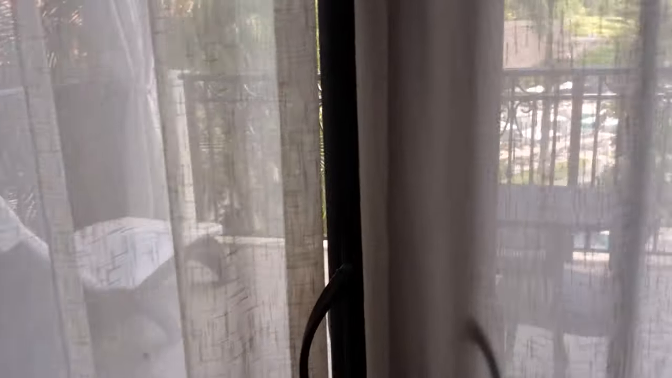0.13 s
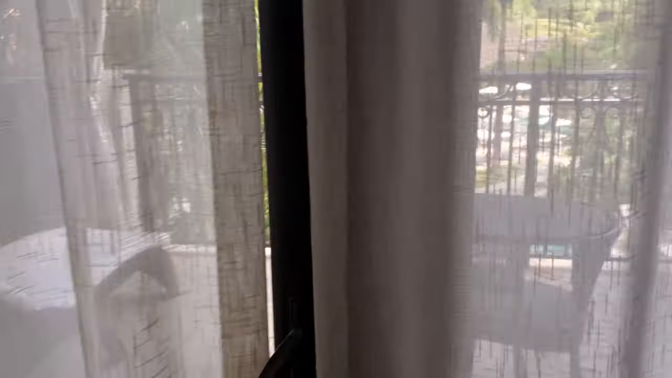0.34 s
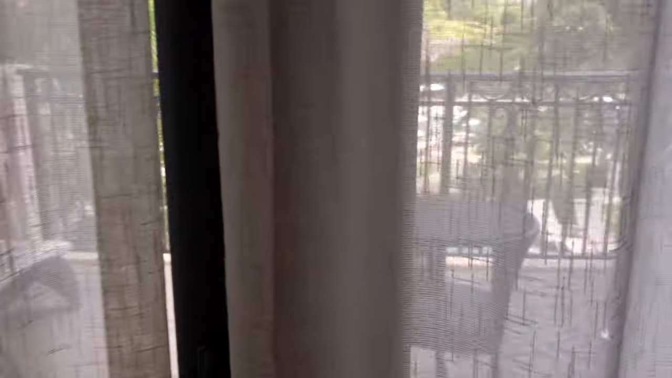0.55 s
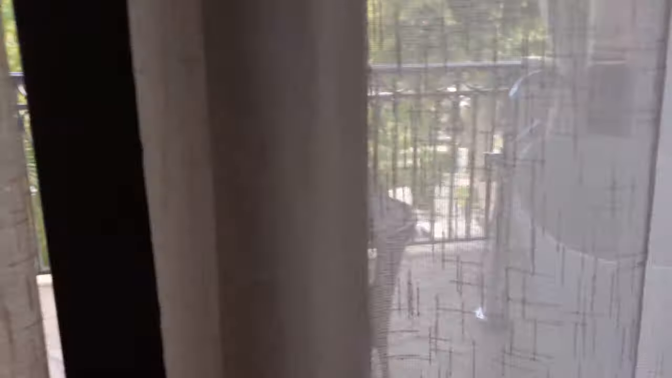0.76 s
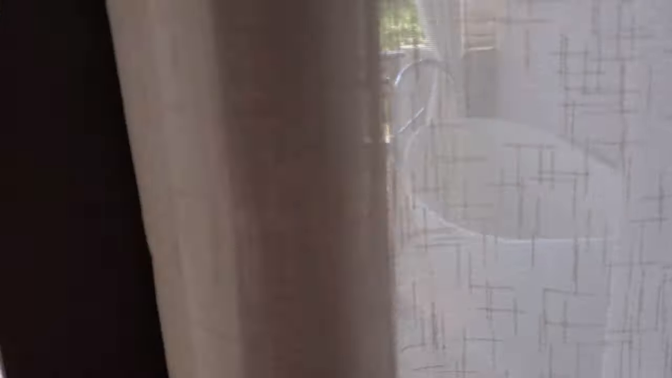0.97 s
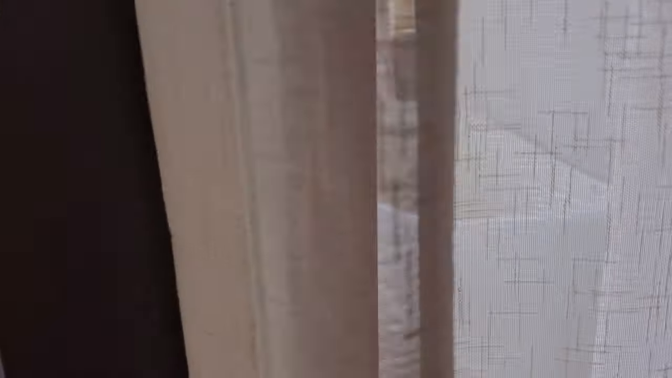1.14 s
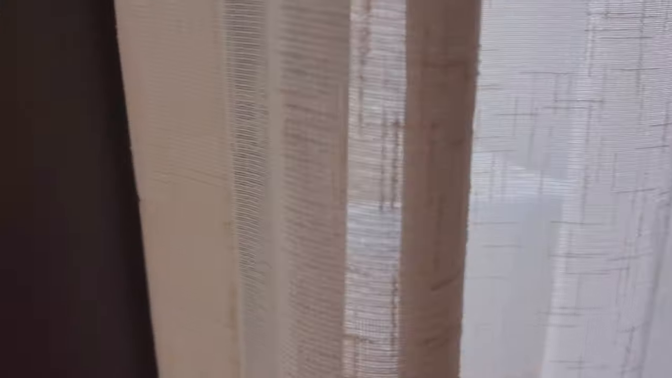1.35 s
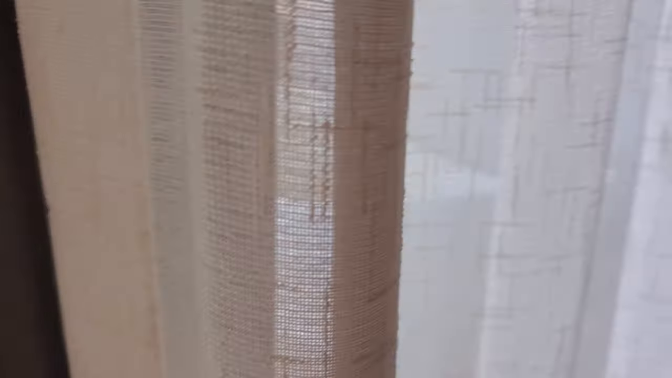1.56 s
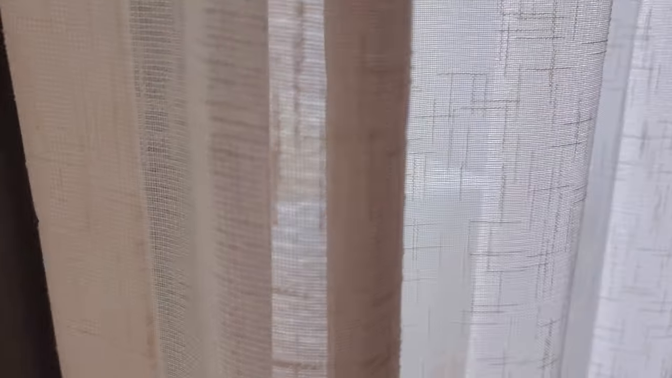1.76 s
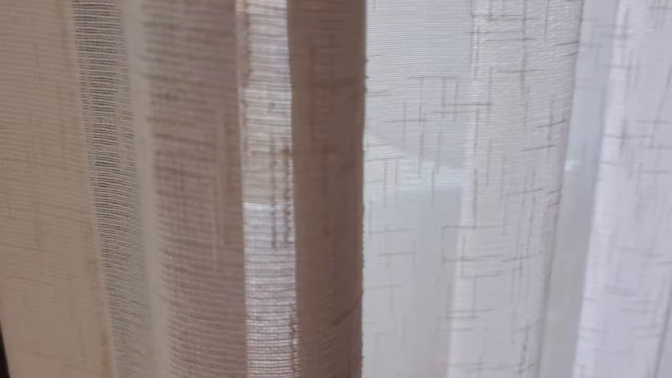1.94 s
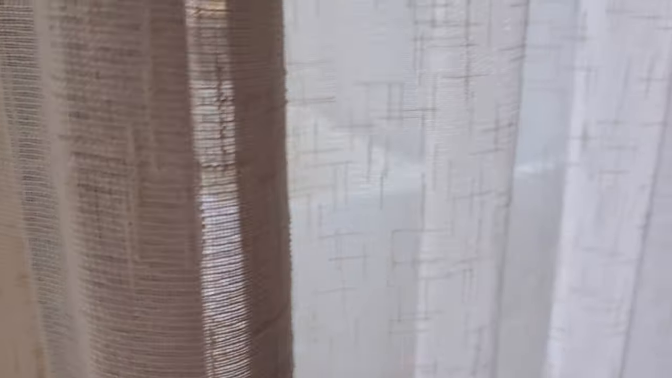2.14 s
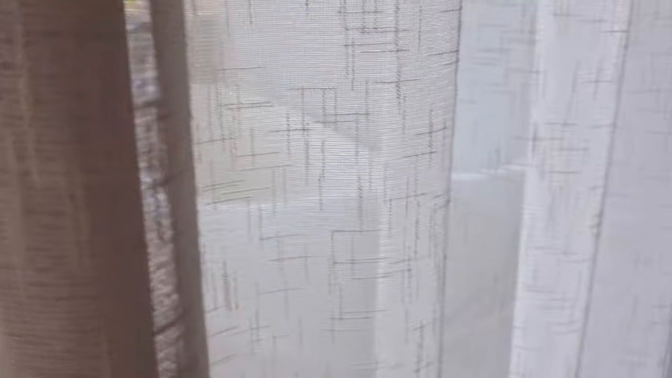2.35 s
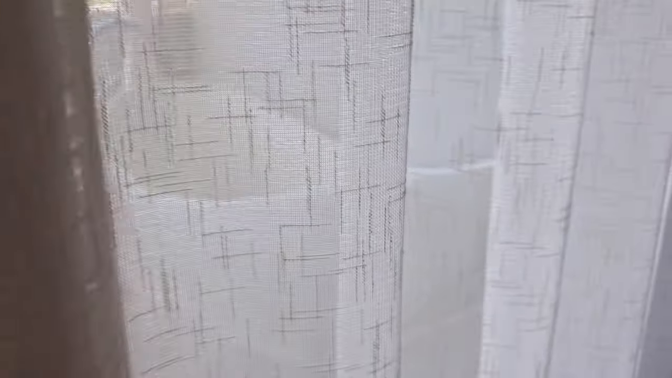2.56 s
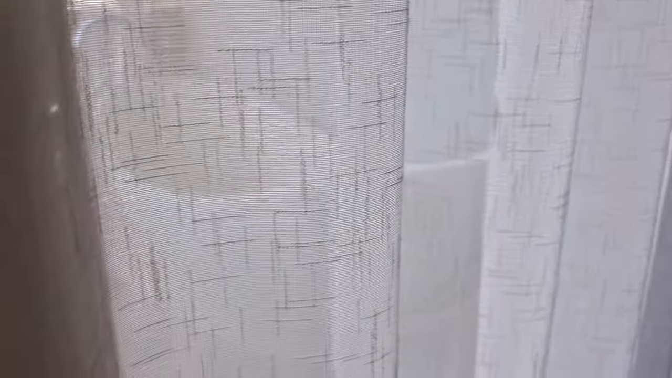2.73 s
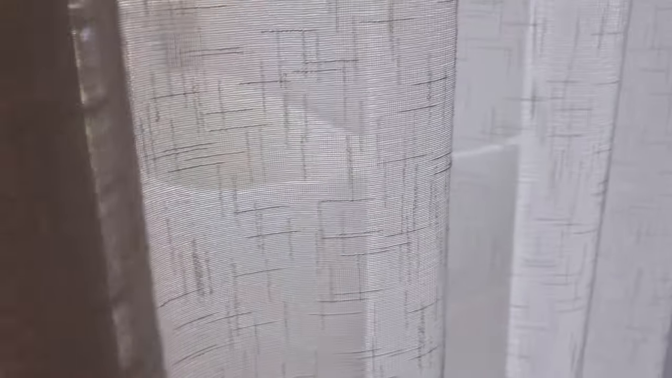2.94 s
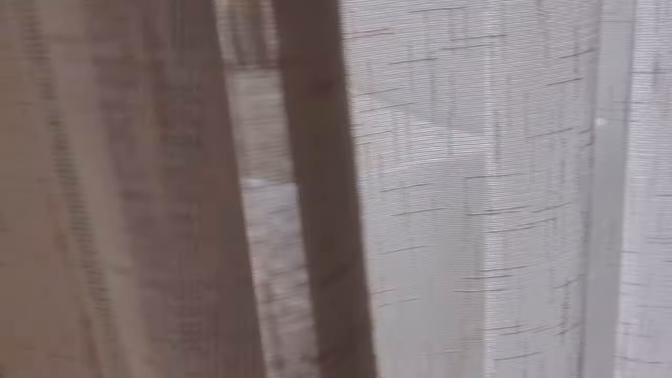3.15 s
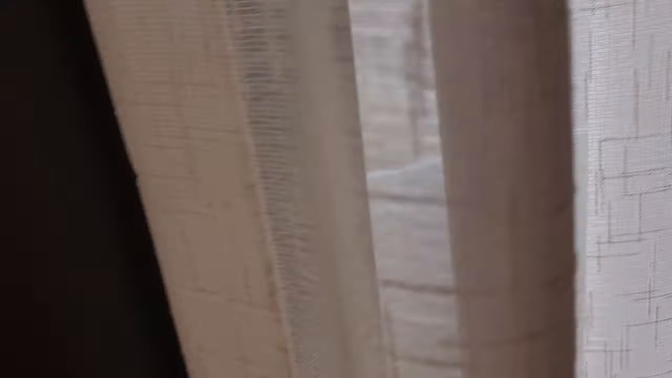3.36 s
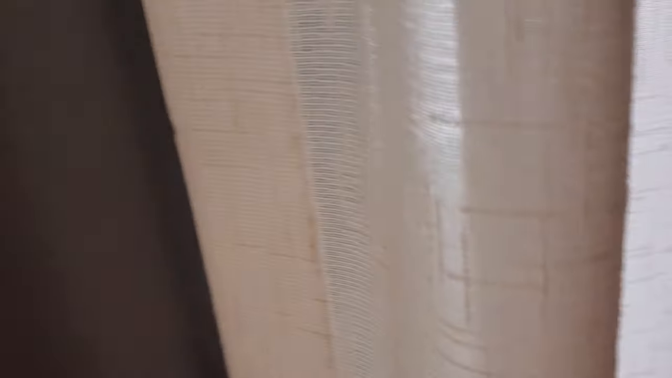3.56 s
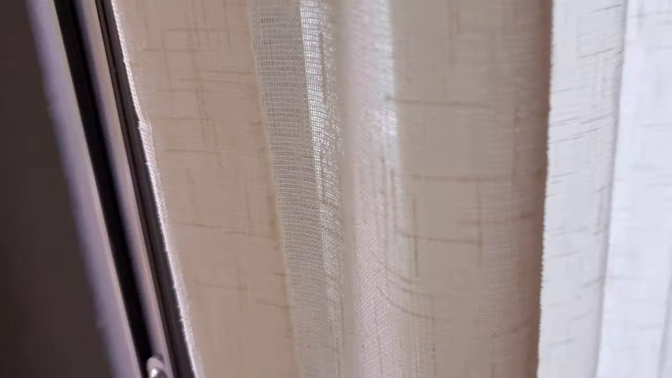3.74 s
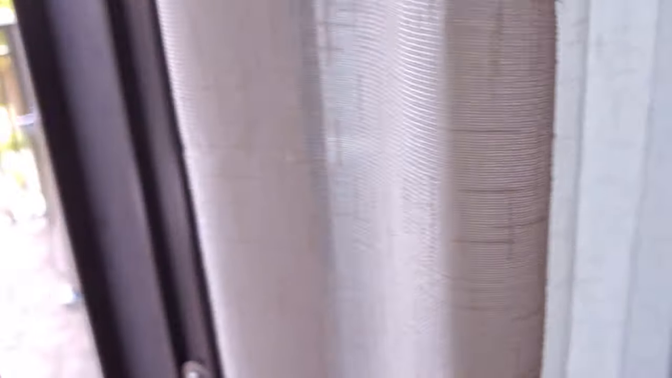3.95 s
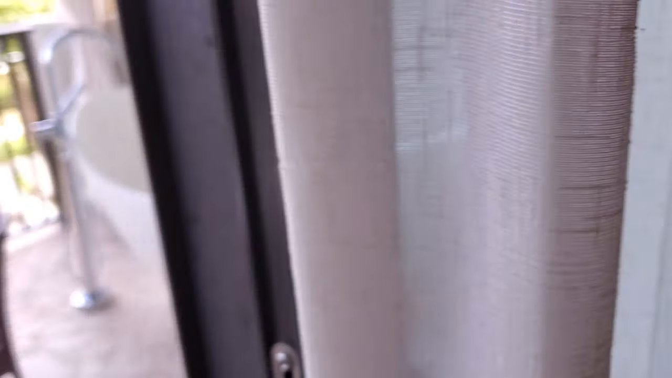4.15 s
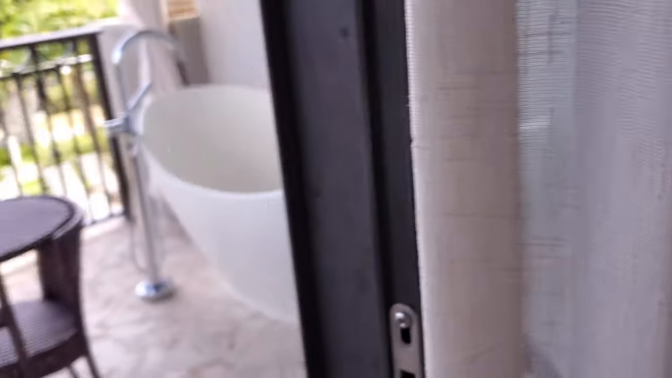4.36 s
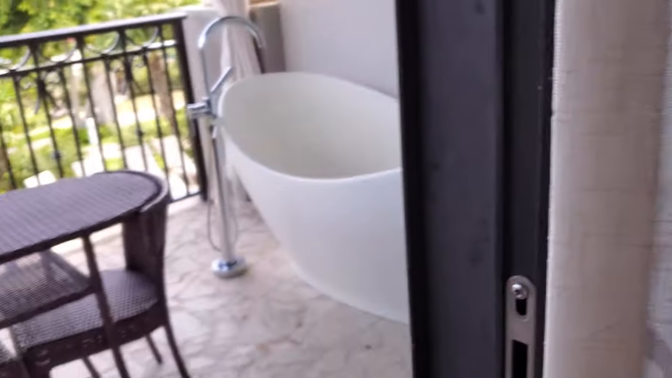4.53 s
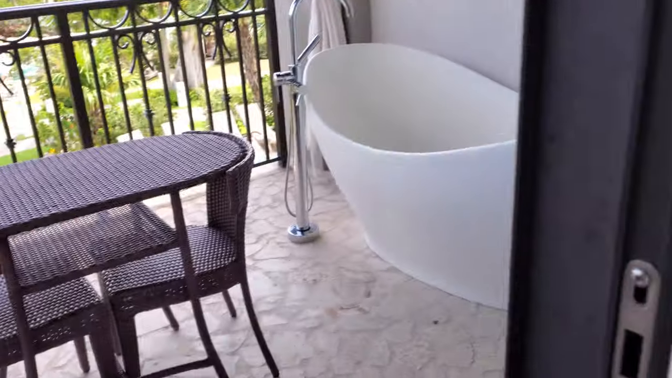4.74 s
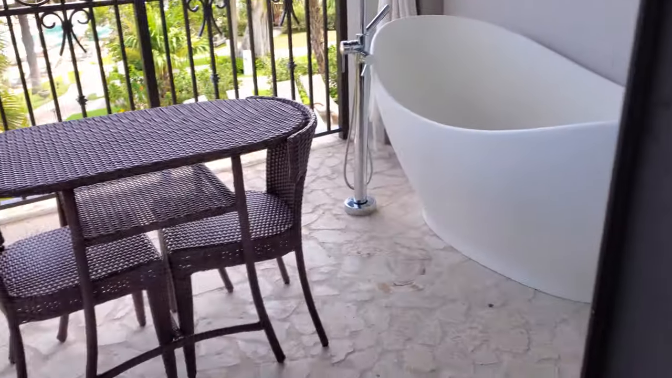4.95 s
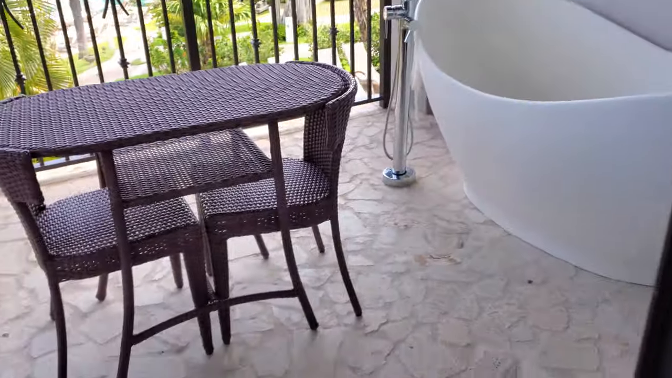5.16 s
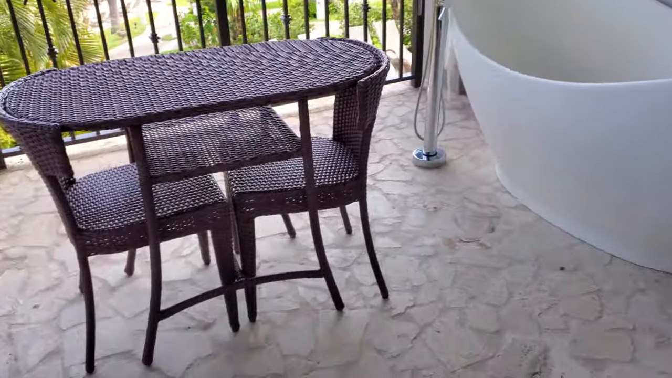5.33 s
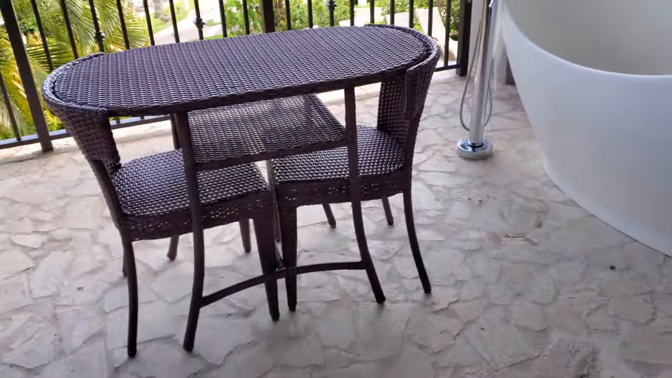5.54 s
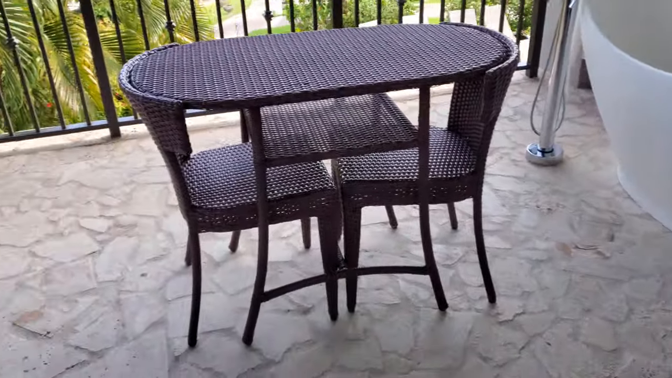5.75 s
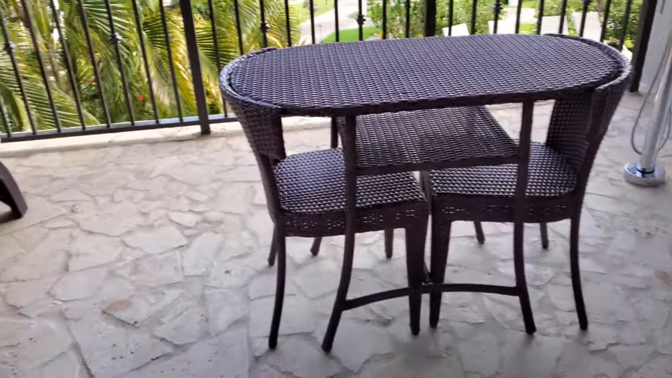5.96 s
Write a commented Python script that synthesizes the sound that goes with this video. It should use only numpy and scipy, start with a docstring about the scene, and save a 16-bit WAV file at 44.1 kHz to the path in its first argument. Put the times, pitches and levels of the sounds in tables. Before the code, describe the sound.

Stereo, near the door of a hard-walled room with a low ventilation hum. Light metal rattles and firm latch clacks come first, with faint cloth rustle and low pane thuds between. The glass door breaks free with the loudest boom and clatter, rumbles and hisses for just over a second, then strikes its stop. Outdoor air remains, with several fading knocks.

```python
"""Sliding glass door to a balcony

In a quiet, hard-walled room, handle and lock clack in coloured noise bursts and the glass booms on its modes.
The door jerks free and rolls: rumbling, chattering and ticking noise, with the steady hiss of brush seals.
It bangs on its stop and duller knocks follow, each a noise crack with ringing modes and a room tail.
Ventilation drones beneath, a curtain rustles, and outdoor air fades in as noise while the gap widens.
"""
import sys
import numpy as np
from scipy import signal
from scipy.fft import rfft, irfft, next_fast_len
from scipy.io import wavfile

SR = 44100
rng = np.random.default_rng(int(sys.argv[2]) if len(sys.argv) > 2 else 0)


def transcribe(signal):
    """Save signal, clipped to [-1, 1], as a 16-bit WAV file at the path in sys.argv[1]."""
    frames = np.atleast_2d(signal).T
    limited = np.clip(frames, -1, 1)
    pcm = np.round(limited * 32767).astype(np.int16)
    wavfile.write(sys.argv[1], SR, pcm)


N = 268965
T = np.arange(N) / SR

# Levels below are set before each source's mix gains; colours are relative, as noise is scaled to unit power.

# Stereo: likeness of the channels (frequency [Hz], left-right correlation before the lag [0-1])
LIKENESS = [(60, 0.98), (290, 1), (640, 0.9), (1400, 0.33), (3000, 0.033), (12000, 0.034)]
# Stereo: balance of the channels (frequency [Hz], left minus right [dB])
LEAN = [(30, 3.5), (120, 1.5), (300, -.6), (1000, -1.8), (2000, -1.2), (4000, -2), (8000, .3), (16000, .5)]
RIGHT_LAG_S, CUTOFF_HZ = 0.0002, 16000

# Room: decay time of the tail (frequency [Hz], t60 [s])
ROOM_T60 = [(60, 0.42), (250, 0.39), (1000, 0.53), (3000, 0.52), (7000, 0.55), (16000, 0.31)]
# Room: starting level of the tail (frequency [Hz], relative level [dB])
ROOM_COLOUR = [(60, 13), (250, 10.5), (1000, 2), (3000, 1.5), (7000, -4), (16000, 3.5)]
FLAT_COLOUR = [(20, 0), (16000, 0)]   # (frequency [Hz], density [dB per Hz])

# Soft bumps (time [s], level [dB], t60 [s], brightness [dB per octave])
BUMPS = [(0, -46, .6, 4.5), (.137, -41.5, 0.21, -1.5), (2.699, -49.5, 0.28, 2), (6.034, -44.5, 0.33, -18)]
# Colour of the bumps (frequency [Hz], density [dB per Hz])
BUMP_COLOUR = [(40, -61), (150, -33), (330, 7), (550, 0), (1100, -1.5), (1600, -10), (4000, -30.5),
               (8000, -54)]
BUMP_SWELL_S = 0.008

# Colour of the indoor air (frequency [Hz], density [dB per Hz])
INDOOR_COLOUR = [(25, -12), (50, -4.5), (80, -1.5), (115, -15), (145, 3.5), (180, -17.5), (280, -6.5),
                 (350, -10), (500, -7), (660, -14.5), (850, -12), (1500, -17), (3000, -23.5), (6000, -32),
                 (8000, -40), (16000, -53)]
# Colour of the outdoor air (frequency [Hz], density [dB per Hz])
OUTDOOR_COLOUR = [(25, -33), (60, 5.5), (120, -12), (210, -17), (310, -11.5), (500, -24), (650, -25),
                  (1100, -21.5), (2500, -23), (6000, -30), (8000, -39), (12500, -35), (16000, -40)]
# Resonances of the ventilation drone (frequency [Hz], width [Hz], relative level [dB])
DRONE = [(147.2, 1.7, -5), (205, 5.9, 5), (353.6, 3.5, 5.5)]
INDOOR_DB, OUTDOOR_DB = -53, -46.5   # outdoors with the door wide open
INDOOR_PAN_DB = -1   # left minus right: the ventilation lies a little to the right

# Folds of the curtain brush past the hand (peak time [s], level [dB], rise and fall time constant [s])
RUSTLES = [(1.33, -54, 0.16), (1.78, -59.5, 0.047), (3.0, -58, 0.16), (3.23, -60, 0.029), (3.39, -69, 0.03),
           (3.61, -64, .04)]
# Colour of the cloth (frequency [Hz], density [dB per Hz])
CLOTH_COLOUR = [(500, -9), (2500, -3), (6000, -3), (8000, -11.5), (16000, -6)]
CURTAIN_REST_DB = -78.5

# Shoves that set the pane booming (time [s], level [dB], swell [s])
SHOVES = [(1.16, -43.5, 0.0092), (1.275, -41, 0.0091), (1.66, -39.5, 0.053), (2.228, -33.5, 0.019),
          (2.89, -41.5, 0.039), (3.142, -41.5, 0.041), (3.678, -14, 0.007), (3.75, -22, 0.058),
          (4.04, -31.5, 0.008)]
# Colour of the shoves (frequency [Hz], density [dB per Hz])
PANE_COLOUR = [(22, -29), (31, -23), (42, -6), (65, 4.5), (90, -3), (125, 4), (170, -12.5), (240, -14),
               (340, -10.5), (600, -71)]
# Modes of the glass in its frame (frequency [Hz], level [dB], t60 [s])
PANE_MODES = [(43, -19, 0.41), (62.3, -6.5, 0.74), (80.3, -1.5, 0.73), (121.8, -5.5, 0.49),
              (251, -19, 0.53), (319, -7.5, 0.49)]
# Colour of the shaking pane (frequency [Hz], density [dB per Hz])
MURMUR_COLOUR = [(25, -33), (50, -7), (80, 4.0), (125, -8.0), (200, -13), (600, -61)]
SHOVE_T60_S = 0.62
SHOVE_TILT_DB, SHOVE_DULLS_DB_PER_S = 2, 240   # per octave: a slower swell is duller
# the hand takes hold of the door, and the run leaves the pane shaking
GRIP_S, GRIP_DB, GRIP_DB_PER_S = 1.1, -55, 41
SHAKEN_DB, SETTLE_DB_PER_S = -44, 6

# Heavier clacks of lock and frame (time [s], level [dB], length of the contact [s])
CLACKS = [(1.66, -35.5, .014), (2.097, -37.5, 0.0075), (2.116, -34.5, 0.023), (2.223, -20, 0.014),
          (2.857, -31, 0.021), (2.875, -23.5, 0.026), (3.677, -20.5, .008), (3.697, -15.5, .016)]
# Colour of the clacks (frequency [Hz], density [dB per Hz])
CLACK_COLOUR = [(88, -27), (150, -11.5), (566, -11.5), (871, -14), (1080, -6.5), (1630, -4), (2220, -2),
                (3220, -7.5), (3840, -8), (4410, -11.5), (6640, -14), (8400, -20.5), (11900, -21),
                (16000, -26)]
# Resonances of aluminium frame and lock (frequency [Hz], width [Hz], level [dB])
FRAME = [(1060, 210, -15), (1670, 15, -29), (1800, 21, -15), (1994, 31, 7), (2170, 34, 9), (2722, 22, 10.5),
         (3270, 19, -5), (3600, 21, -18), (5730, 34, -29), (6200, 57, 8)]
# The frame grinds on the track as it comes free (time [s], level [dB], brightness [dB per octave])
GRINDS = [(3.602, -40, -1), (3.627, -37.5, 0), (3.748, -37, -4.5)]
# Light rattles of the handle (time [s], level [dB], brightness [dB per octave])
RATTLES = [(1.163, -49.5, 1.5), (1.272, -23.5, 1), (1.29, -27.5, 0), (1.329, -30, 1.5), (1.381, -27.5, 0.1),
           (1.644, -26, -0.5), (1.657, -27, -1), (1.967, -27, .5), (2.168, -54.5, 12), (3.329, -33, 2),
           (3.533, -33.5, -1.5), (3.756, -24.5, 7), (3.853, -30.5, 5), (3.883, -30.5, 9), (3.951, -29.5, 3),
           (5.447, -20.5, -.5), (5.477, -34, 8)]
# Colour of the rattles (frequency [Hz], density [dB per Hz])
RATTLE_COLOUR = [(150, -2), (400, -2), (900, -5.5), (1250, 0), (1600, -0.5), (2300, 0), (2800, -1.5),
                 (3400, -3.5), (4300, -5.5), (6700, -8.5), (8000, -19), (12000, -18.5), (16000, -26)]
# Small metal parts ping on their own note (time [s], level [dB], pitch [Hz])
PINGS = [(1.329, -36.5, 3300), (1.382, -32, 2870), (3.329, -37, 5950), (3.637, -25.5, 1770),
         (3.699, -23, 1940), (3.853, -31.5, 2900), (4.917, -24, 3070)]
# Band of a ping round its note (multiple of the pitch [ratio], density [dB per Hz])
PING_BAND = [(.5, -45), (.75, -22), (.92, -3), (1, 0), (1.09, -3), (1.33, -22), (2, -50)]
CLACK_ATTACK_S, CLACK_T60_S = 0.0047, 0.08
CLACK_PLAIN_DB, CLACK_BRIGHTENS = -21, 0.12   # dB per octave for each dB over the plain level
GRIND_LENGTH_S, GRIND_T60_S = .01, 0.96
RATTLE_SWELL_S, RATTLE_T60_S = 0.004, 0.055
PING_SWELL_S, PING_T60_S = .002, 0.049

# Colour of the rolling rumble (frequency [Hz], density [dB per Hz])
ROLL_COLOUR = [(18, -42), (30, -12), (69, -4.5), (174, -9.5), (284, -3.5), (344, -8.5), (455, -6),
               (640, -14), (942, -11.5), (1140, -15), (1610, -9.5), (3710, -24), (5000, -39), (6500, -53),
               (11000, -120)]
# Colour of the brush seal (frequency [Hz], density [dB per Hz])
BRUSH_COLOUR = [(1500, -14), (3000, -3.5), (4300, -7), (5700, 3.5), (6600, -4), (7800, -9.5), (9500, -5),
                (11800, 1), (13500, -5), (16000, -2.5)]
# Loudest ticks of the rollers over the track (time of fullest swell, roughly [s], level [dB])
TICKS = [(4.119, -30), (4.304, -35.5), (4.378, -31.5), (4.415, -38), (4.465, -32), (4.551, -35),
         (4.59, -30), (4.656, -38)]
# Colour of ticks and chatter (frequency [Hz], density [dB per Hz])
TICK_COLOUR = [(500, -45), (780, -7), (920, 2), (1050, -10.5), (1200, -10.5), (1700, -14), (3000, -26),
               (8000, -60)]
TICK_SWELL_S, TICK_T60_S = 0.00395, 0.049
# the door runs at an even speed from the jerk that frees it to its stop
START_S, STOP_S = 3.66, 4.87
ROLL_DB, BRUSH_DB = -35.5, -41.5
PICKUP_DB_PER_S, HALT_DB_PER_S = 333, 400
SURGE_S, SURGE_WIDTH_S, SURGE_DB = 3.86, 0.12, 8   # the first pull loads the rollers

# The door meets its stop and rebounds (time [s], level [dB], swell [s], t60 [s], brightness [dB per octave])
BANGS = [(4.864, -18, 0.005, 0.18, 2), (4.906, -23, 0.0036, 0.31, -1)]
# Modes rung by the stop (frequency [Hz], level [dB], t60 [s])
STOP_MODES = [(110, -7, 0.67), (187.6, -7, 0.32), (231.4, -1.5, 0.496), (269.8, 3.5, 0.51),
              (312.4, -7.5, 0.58), (367, -6, 0.29), (501, -12.5, 0.36), (726, -39, .3)]
# Dull knocks on track and sill (time [s], level [dB], swell [s])
KNOCKS = [(5.443, -22, 0.0073), (5.643, -27, 0.0072), (5.78, -38, 0.016)]
# Modes of the sill (frequency [Hz], level [dB], t60 [s])
SILL_MODES = [(141.9, 0.5, 0.67), (175, -28, 0.27), (236, 1.5, 0.95), (302, -5, 0.4), (339, -9, 0.18),
              (510, -7, 0.31)]
# Colour of bangs and knocks (frequency [Hz], density [dB per Hz])
KNOCK_COLOUR = [(35, -42), (70, -20), (180, 1.5), (330, -1), (450, -4), (620, -8.5), (900, -8.5),
                (1150, -7), (2000, -11.5), (3200, -16), (5500, -20.5), (6700, -25), (8000, -35),
                (12000, -33.5), (16000, -37)]
KNOCK_T60_PER_SWELL = 22   # a knock that swells more slowly lasts longer


def from_db(db):
    """Decibels to gain."""
    return 10 ** (np.asarray(db) / 20)


def rms_one(x):
    """Scale to unit power."""
    return x / np.sqrt(np.mean(x ** 2) + 1e-20)


def at_hz(points, hz):
    """Read a table on a log-frequency axis."""
    f, value = np.transpose(points)
    return np.interp(np.log(hz + 1), np.log(f), value)


def lean(hz):
    """Gain of the left and right channel at each frequency."""
    return from_db(np.multiply.outer([.5, -.5], at_hz(LEAN, hz)))


def drift(rate, size):
    """Smooth random wander of about unit spread, with a new random point `rate` times a second."""
    knots = rng.standard_normal(size // 20 + 2)
    return np.interp(np.arange(size) * rate / SR, np.arange(len(knots)), knots)


def noise(colour, size=N, tilt_db=0, grains=1):
    """Unit-power stereo noise, grainy or smooth, coloured: alike in the bass, apart in the treble."""
    padded = next_fast_len(size, real=True)
    hz = np.fft.rfftfreq(padded, 1 / SR)
    mid, side = rfft(grains * rng.standard_normal((2, size)), padded)
    alike = np.clip(at_hz(LIKENESS, hz), 0, 1)
    pair = np.sqrt(1 + alike) * mid + np.sqrt(1 - alike) * side * [[1], [-1]]
    pair[1] *= np.exp(-2j * np.pi * hz * RIGHT_LAG_S)
    heard = (hz > 20) & (hz < CUTOFF_HZ)
    gain = heard * lean(hz) * from_db(at_hz(colour, hz) + tilt_db * np.log2(hz + 1))
    return rms_one(irfft(pair * gain, padded)[:, :size])


def resonate(x, resonances):
    """Parallel two-pole resonances: a narrower width rings longer."""
    out = 0
    for hz, width, db in resonances:
        r = np.exp(-np.pi * width / SR)
        poles = [1, -2 * r * np.cos(2 * np.pi * hz / SR), r * r]
        peak_gain = from_db(db) * (1 - r * r) / 2
        out = out + peak_gain * signal.lfilter([1, 0, -1], poles, x + 1e-18)
    return out


def add(out, s, sound):
    """Mix a sound in at a given time."""
    part = out[:, round(s * SR):][:, :sound.shape[-1]]
    part += sound[..., :part.shape[1]]


def contacts(rows, colour, grain_db, grain_rate, attack_s=np.inf):
    """Tiny contacts of loose parts as grainy noise: swell, then decay; a short attack holds in between."""
    out, t = np.zeros((2, N)), T[:SR // 2]
    for s, db, swell, t60, tilt_db in rows:
        rise = np.minimum(t / min(swell, attack_s), 1)
        decay = from_db(-60 * np.maximum(t - swell, 0) / t60)
        grains = from_db(grain_db * drift(grain_rate, len(t)))
        flurry = noise(colour, size=len(t), tilt_db=tilt_db, grains=grains)
        add(out, s, from_db(db) * rise * decay * flurry)
    return out


def ringing(rows, modes):
    """Each blow excites a body's modes as decaying sines, a little differently every time."""
    out, t = np.zeros((2, N)), T[:SR]
    hz, mode_db, t60 = np.transpose(modes)
    rings = from_db(-60 * t / t60[:, None]) * np.sin(2 * np.pi * hz[:, None] * t)
    signs = (-1) ** np.arange(len(hz))
    for s, db, swell, _, tilt_db in rows:
        chance_db = rng.standard_normal(len(hz))
        strength = from_db(db + mode_db + tilt_db * np.log2(hz / hz.mean()) + chance_db)
        add(out, s, np.minimum(t / swell, 1) * ((lean(hz) * signs * strength) @ rings))
    return out


def room(x, build_s):
    """Reverb from a diffuse noise tail that builds up and dies octave by octave."""
    t, tail = T[:SR * 3 // 4], 0
    wash = noise(FLAT_COLOUR, size=len(t))
    for hz in 44 * 2 ** np.arange(9):
        edges = [hz / np.sqrt(2), hz * np.sqrt(2)]
        band = signal.sosfilt(signal.butter(2, edges, "band", fs=SR, output="sos"), wash)
        fade = from_db(at_hz(ROOM_COLOUR, hz) - 60 * t / at_hz(ROOM_T60, hz))
        tail = -tail + band * fade   # neighbouring octaves alternate in sign
    tail = rms_one(tail * np.minimum(t / build_s, 1)) / np.sqrt(len(t))
    return signal.fftconvolve(x, tail, axes=1)[:, :N]


def soft_bumps():
    """Soft bumps: short swells of mid-heavy grainy noise that die away."""
    rows = [(s, db, BUMP_SWELL_S, t60, tilt_db) for s, db, t60, tilt_db in BUMPS]
    return contacts(rows, BUMP_COLOUR, grain_db=1.5, grain_rate=150)


def air():
    """Ventilation drones through narrow resonances; outdoor hiss comes in as the gap widens."""
    drone = rms_one(resonate(noise(INDOOR_COLOUR), DRONE))
    vent = noise(INDOOR_COLOUR) + from_db(-6.5) * drone
    indoor_gain = from_db(INDOOR_DB + INDOOR_PAN_DB * np.array([[.5], [-.5]]))
    gap = np.clip((T - START_S) / (STOP_S - START_S), 0, 1)
    return indoor_gain * vent + gap * from_db(OUTDOOR_DB) * noise(OUTDOOR_COLOUR)


def curtain():
    """Sheer cloth rustles faintly as flickering noise, swelling and fading with each fold."""
    folds = sum(from_db(db) * np.exp(-np.abs(T - s) / width) for s, db, width in RUSTLES)
    flicker = from_db(1.6 * drift(150, N))
    return (from_db(CURTAIN_REST_DB) + folds) * noise(CLOTH_COLOUR) * flicker


def pane():
    """The glass booms on its low modes when shoved, and murmurs while held and after the door is freed."""
    shoves = [(s, db, swell, SHOVE_T60_S, SHOVE_TILT_DB - SHOVE_DULLS_DB_PER_S * swell)
              for s, db, swell in SHOVES]
    thud = contacts(shoves, PANE_COLOUR, grain_db=-2.0, grain_rate=45)
    boom = from_db(-3.5) * thud + from_db(-6.5) * ringing(shoves, PANE_MODES)
    held = from_db(GRIP_DB - GRIP_DB_PER_S * np.maximum(GRIP_S - T, 0))
    shaken = (T > START_S) * from_db(SHAKEN_DB - SETTLE_DB_PER_S * (T - START_S))
    return boom + np.hypot(held, shaken) * noise(MURMUR_COLOUR)


def pings():
    """Each loose part buzzes in a narrow noise band round its note."""
    out, t = np.zeros((2, N)), T[:SR // 4]
    for s, db, hz in PINGS:
        band = [(hz * ratio, band_db) for ratio, band_db in PING_BAND]
        shape = from_db(db - 60 * t / PING_T60_S) * np.minimum(t / PING_SWELL_S, 1)
        add(out, s, shape * noise(band, size=len(t)))
    return out


def latch():
    """Handle and lock clack and rattle, the aluminium frame sings with the clacks, and the room answers."""
    # a harder clack is brighter
    blows = [(s, db, length, CLACK_T60_S, CLACK_BRIGHTENS * (db - CLACK_PLAIN_DB))
             for s, db, length in CLACKS]
    grinds = [(s, db, GRIND_LENGTH_S, GRIND_T60_S, tilt_db) for s, db, tilt_db in GRINDS]
    taps = [(s, db, RATTLE_SWELL_S, RATTLE_T60_S, tilt_db) for s, db, tilt_db in RATTLES]
    clacks = contacts(blows + grinds, CLACK_COLOUR, grain_db=2.5, grain_rate=878, attack_s=CLACK_ATTACK_S)
    rattles = contacts(taps, RATTLE_COLOUR, grain_db=4.0, grain_rate=1110)
    singing = from_db(-6) * resonate(clacks, FRAME)
    echo = room(from_db(-10.0) * clacks + from_db(-9.5) * rattles, build_s=0.022)
    return clacks + singing + rattles + from_db(6.0) * pings() + echo


def running():
    """Gain of the door's motion: it picks up, holds, and dies at the stop."""
    before, after = np.maximum(START_S - T, 0), np.maximum(T - STOP_S, 0)
    return from_db(-PICKUP_DB_PER_S * before - HALT_DB_PER_S * after)


def rolling():
    """Rollers rumble, chatter and tick along the track; the brush seal hisses along the frame."""
    surge_db = SURGE_DB * np.exp(-((T - SURGE_S) / SURGE_WIDTH_S) ** 2)
    roll_gain = running() * from_db(ROLL_DB + surge_db)
    rumble = noise(ROLL_COLOUR, grains=from_db(2.0 * drift(250, N)))
    # small bumps of the track come some tens of times a second
    chatter = noise(TICK_COLOUR, grains=np.maximum(drift(110, N), 0))
    rows = [(s - TICK_SWELL_S / 2, db, TICK_SWELL_S, TICK_T60_S, 0) for s, db in TICKS]
    ticks = contacts(rows, TICK_COLOUR, grain_db=1.0, grain_rate=200)
    hiss = running() * from_db(BRUSH_DB) * noise(BRUSH_COLOUR, grains=from_db(0.48 * drift(120, N)))
    return roll_gain * (from_db(-1.5) * rumble + from_db(-14.0) * chatter) + from_db(1.3) * ticks + hiss


def stop_and_sill():
    """Blows further off: a dull noise crack, the low ringing modes of stop and sill, and the room."""
    knocks = [(s, db, swell, KNOCK_T60_PER_SWELL * swell, 0) for s, db, swell in KNOCKS]
    cracks = contacts(BANGS + knocks, KNOCK_COLOUR, grain_db=1.5, grain_rate=500)
    bodies = from_db(1.5) * ringing(BANGS, STOP_MODES) + from_db(-4.5) * ringing(knocks, SILL_MODES)
    return from_db(3.0) * cracks + bodies + room(from_db(-4.5) * cracks, build_s=0.01)


def scene():
    """Unlatch, shove, roll and stop, over the steady air."""
    return soft_bumps() + air() + curtain() + pane() + latch() + rolling() + stop_and_sill()


def record(dry):
    """A steep low-pass cuts off the top."""
    return signal.sosfilt(signal.ellip(10, .1, 80, CUTOFF_HZ, fs=SR, output="sos"), dry)


dry = scene()
out = record(dry)
transcribe(out)
```